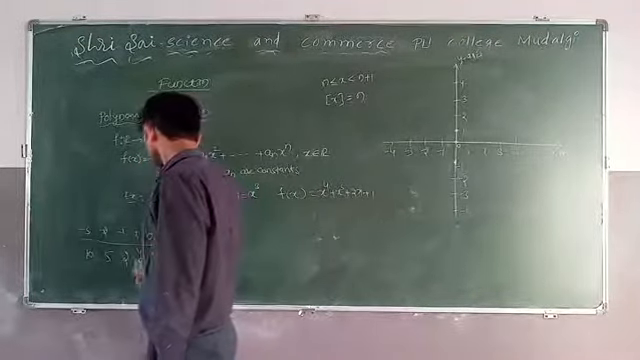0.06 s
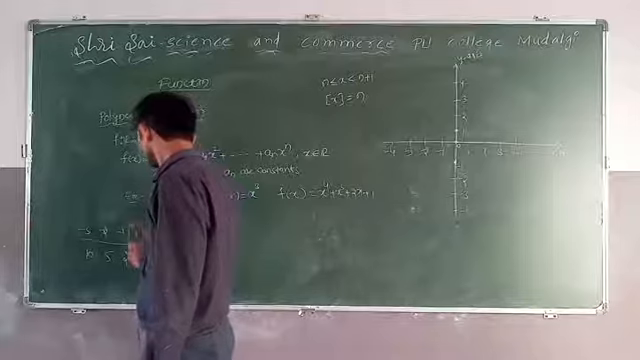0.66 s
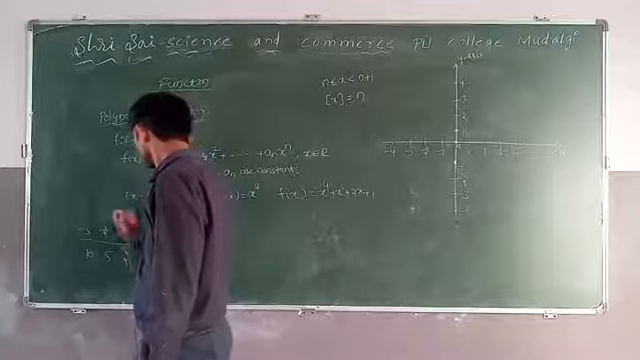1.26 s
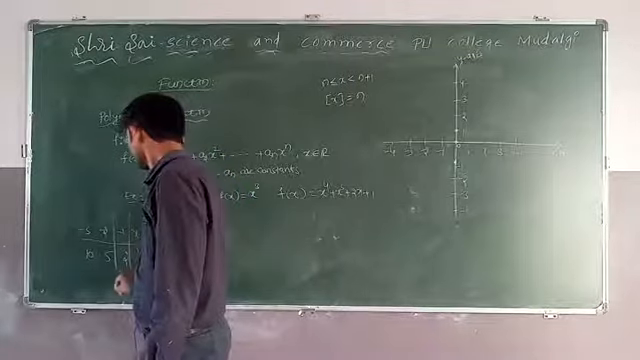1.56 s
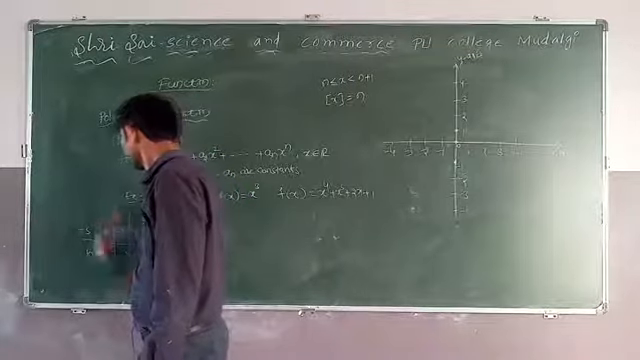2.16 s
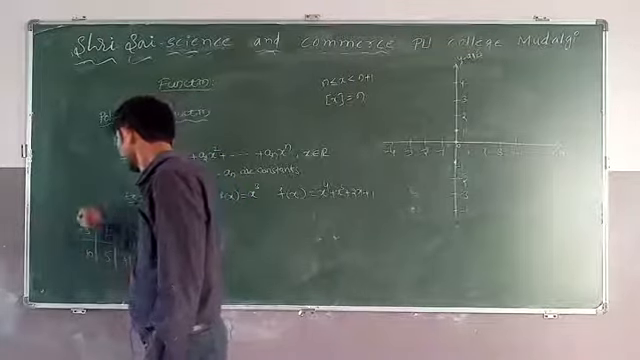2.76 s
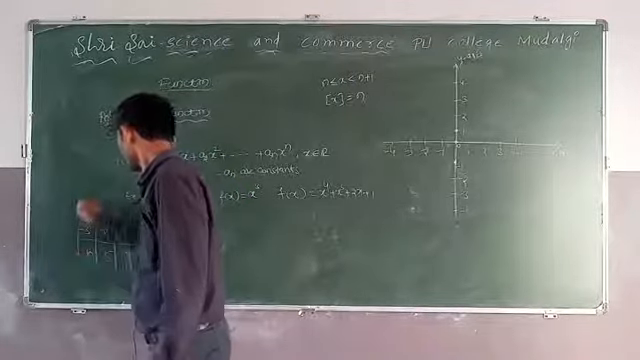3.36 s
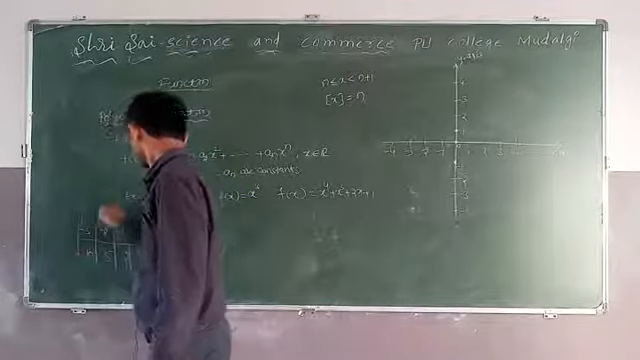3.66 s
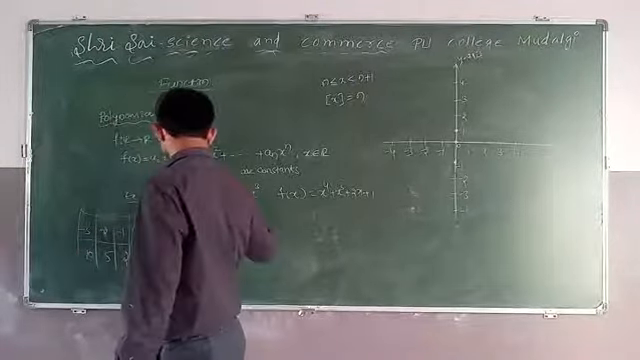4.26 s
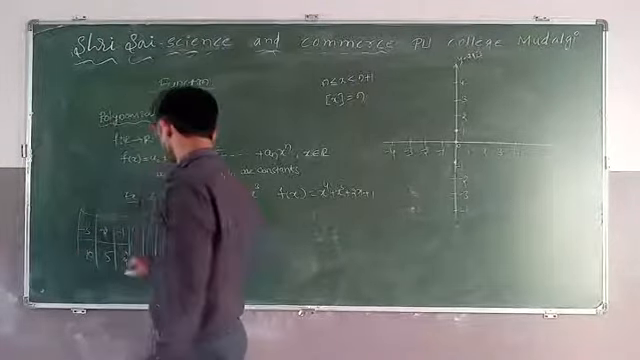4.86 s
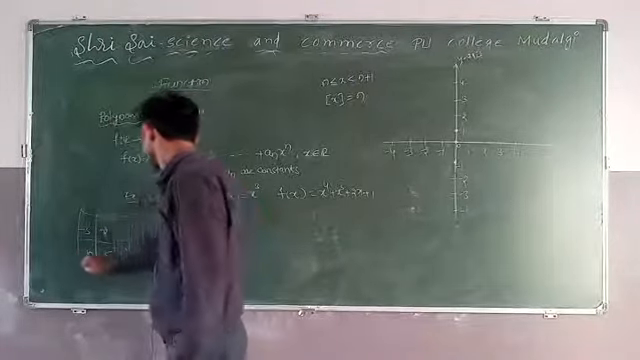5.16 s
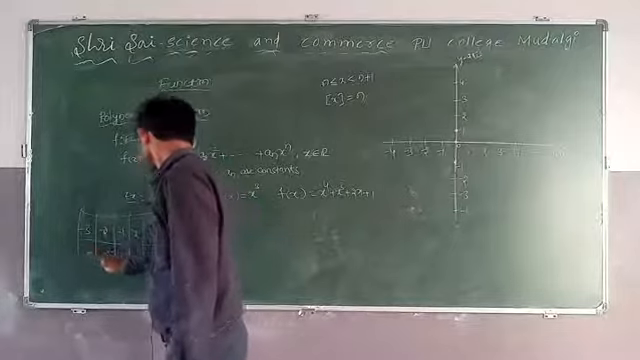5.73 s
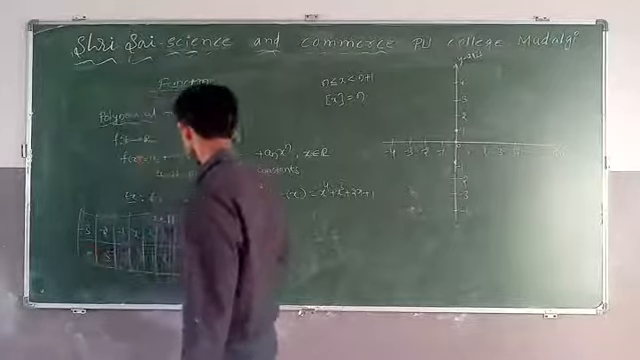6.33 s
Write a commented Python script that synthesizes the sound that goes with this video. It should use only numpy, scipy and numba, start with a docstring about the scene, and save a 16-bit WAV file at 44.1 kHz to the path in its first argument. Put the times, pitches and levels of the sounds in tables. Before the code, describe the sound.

The echo of a chalk stroke fades in a bare classroom, over a faint low hum and muffled traffic. Close to the microphone, chalk taps a blackboard at about 0.5, 1.3, 2.0 and 2.7 seconds. Each tap leads into a short, gritty scrape that swells, drops in pitch as it stops and rings in the room. The hand bumps the board softly near 1.5 and 2.2 seconds. Outside, a vehicle passes, loudest around 1.3 seconds, and a far idling engine gradually pulls away from 2 seconds on. A tap at 3.4 seconds starts a longer, lighter line lasting until 4.5, followed by a faint short rub. Another tap at 5.5 seconds begins a line that ends near 6.1, then a tiny scrape and a duller tap come at 6.3. A sleeve swishes very faintly around 2.6, 4.6 and 5.2 seconds.

```python
"""First, the echo of a chalk line dies away in a bare classroom, over a murmur of traffic and a faint hum.
Close to the microphone, more lines are ruled on the blackboard: the chalk lands with a tap, scrapes on
as a stream of tiny slips and falls in pitch as it brakes. Now and then the hand bumps the board or a
sleeve swishes. Outside, a vehicle goes by and a far engine idles, then pulls away."""
import sys
import numpy as np
from scipy import signal
from scipy.fft import rfft, irfft, next_fast_len
from scipy.io import wavfile
from scipy.ndimage import uniform_filter1d
from numba import njit

SR = 44100
rng = np.random.default_rng(int(sys.argv[2]) if len(sys.argv) > 2 else 0)


def master(y):
    """Save y as 16-bit WAV."""
    cut = np.clip(np.atleast_2d(y).T, -1, 1)
    pcm = np.round(cut * 32767)  # scale
    wavfile.write(sys.argv[1], SR, pcm.astype(np.int16))


N = 281881
TIME = np.arange(N) / SR


def from_db(db):
    """Decibels to gain."""
    return 10 ** (np.asarray(db) / 20)


def rms_one(x):
    """Scale to rms 1."""
    return x / np.sqrt(np.mean(x ** 2) + 1e-20)


def evened(x, size):
    """Hold the running rms over `size` samples at 1."""
    return x / np.sqrt(np.abs(uniform_filter1d(x ** 2, size)) + 1e-20)


def at_hz(points, hz):
    """Read a table on a log-frequency axis."""
    table_hz, value = np.transpose(points)
    return np.interp(np.log(np.maximum(hz, 1)), np.log(table_hz), value)


def coloured(x, spectrum):
    """Filter a sound by a curve of frequency_hz, gain_db."""
    size = next_fast_len(N + SR // 10)
    gain = from_db(at_hz(spectrum, np.fft.rfftfreq(size, 1 / SR)))
    return irfft(rfft(x, size) * gain, size)[:N]


def cut(x, hz, kind, order=2):
    """Butterworth low- or high-pass."""
    return signal.sosfilt(signal.butter(order, hz, kind, fs=SR, output="sos"), x)


def drift(per_s):
    """A random curve of rms 1 that turns `per_s` times a second."""
    return rms_one(np.interp(TIME * per_s, np.arange(N), rng.standard_normal(N)))


def swell(peak_s, attack_s, release_s):
    """A rounded rise to 1 at a moment, and a rounded fall after it."""
    return np.exp(-((TIME - peak_s) / np.where(TIME < peak_s, attack_s, release_s)) ** 2)


def ring(x, modes):
    """Each mode rings as a dying sine at a slightly random level; neighbours swing opposite ways."""
    out = 0
    for k, (hz, db, t60_s) in enumerate(modes):
        decay, angle = from_db(-60 / (t60_s * SR)), 2 * np.pi * hz / SR
        swing = signal.lfilter([0, np.sin(angle)], [1, -2 * decay * np.cos(angle), decay ** 2], x + 1e-18)
        out = out + (-1) ** k * from_db(db + rng.normal(0, 1)) * swing
    return out


# How long the bare classroom rings: frequency_hz, t60_s
ROOM_DECAY = [(200, 1.6), (700, 2.2), (2000, 2.0), (3000, 1.85), (4000, 1.2), (5000, .8), (6500, .6),
              (8000, .4), (12000, .2)]
# Colour of its reverberation at the microphone: frequency_hz, gain_db
ROOM_COLOUR = [(200, -10), (700, -2), (2000, -1.5), (3000, -1.5), (4000, -2.5), (6000, -4.5), (9000, -19),
               (14000, -16.5)]
def classroom(build_s=0.022):
    """The room's answer to a click: dense echoes that build up, then die sooner in the treble."""
    t = TIME[:3 * SR]
    hz, white = np.fft.rfftfreq(len(t), 1 / SR), rfft(rng.standard_normal(len(t)))
    edges_hz, out = np.geomspace(80, 16000, 56), 0
    for low, high in zip(edges_hz, edges_hz[1:]):
        centre_hz = np.sqrt(low * high)
        band = irfft(white * ((hz >= low) & (hz < high)))
        fade = from_db(-60 * t / at_hz(ROOM_DECAY, centre_hz)) * (1 - np.exp(-t / build_s))
        out = out + from_db(at_hz(ROOM_COLOUR, centre_hz)) * band * fade / np.linalg.norm(fade)
    return out


# How the board radiates a scrape, here and in scrape(): frequency_hz, gain_db
BOARD_COLOUR = [(150, -5), (600, 1.5), (1250, -0.5), (2000, 0), (3000, 0), (4000, -7), (5000, -14.5),
                (6500, -22), (8000, -37), (11000, -49.5), (13000, -56.5), (15500, -45.5)]
def dying_echo(room, level_db=-35.5, pitch_hz=2150, ago_s=0.24):
    """All around the microphone, a line drawn just before still rings in the room."""
    tail = np.pad(room[round(ago_s * SR):], (0, N))[:N]
    octave = cut(cut(tail, pitch_hz, "high"), pitch_hz * 2, "low")
    echo = coloured(octave, BOARD_COLOUR)
    return from_db(level_db) * echo / np.std(echo[:SR // 10])


# Murmur of the traffic, heard from indoors: frequency_hz, gain_db
MURMUR_COLOUR = [(150, -6.5), (350, -3.5), (580, 1.5), (760, 3), (1000, -2), (1330, 3), (1620, -2),
                 (1930, 5), (2150, -4.5), (2600, -3), (3300, -10.5), (4000, -20), (5000, -34.5),
                 (8500, -56)]
# The rumble beneath it: frequency_hz, gain_db
RUMBLE_COLOUR = [(25, -32.5), (45, -2.5), (58, -4.5), (70, -6), (100, -6.5), (113, -1), (122, -2),
                 (132, -1), (150, -2), (185, -1), (260, -11), (450, -11.5), (900, -42), (2000, -74)]
def street(murmur_db=-42.5, rise_db_per_s=1.0, rumble_db=-49.5, hiss_db=-93):
    """Outside, slowly thickening traffic, blurred by the room: murmur, rumble and a trace of hiss."""
    # one vehicle goes by and swells both murmur and rumble
    passing = swell(1.265, attack_s=0.22, release_s=1.7)
    pass_murmur_db, pass_rumble_db, waver_db = -38.5, -39, 0.5
    murmur = rms_one(cut(coloured(rng.standard_normal(N), MURMUR_COLOUR), 6000, "low"))
    murmur *= from_db(waver_db * drift(12))
    murmur *= np.hypot(from_db(murmur_db + rise_db_per_s * TIME), from_db(pass_murmur_db) * passing)
    rumble = rms_one(coloured(rng.standard_normal(N), RUMBLE_COLOUR))
    rumble *= np.hypot(from_db(rumble_db), from_db(pass_rumble_db) * passing)
    return murmur + rumble + from_db(hiss_db) * rng.standard_normal(N)


# Faint hum in the classroom: pitch_hz, level_db
HUM_TONES = [(112, -51), (131, -57)]
def hum(waver_db=4.5, wander_rad=0.66):
    """Room tone: low sines that waver in level and phase."""
    out = 0
    for hz, db in HUM_TONES:
        amplitude = np.sqrt(2) * from_db(db + waver_db * drift(2.7))
        out = out + amplitude * np.sin(2 * np.pi * hz * TIME + wander_rad * drift(4))
    return out


# Low resonances of the classroom, which pick out the engine's orders: centre_hz, width_hz, gain_db
ROOM_RESONANCES = [(46.4, 13, -9.5), (60.3, 4.4, -8.5), (73, 3.1, -5.5), (78.9, 4.7, 2.5), (96.4, 4, -2),
                   (110.7, 4.5, -2.5), (128, 7.6, -9.5), (148.3, 8.2, -4.5), (181.3, 13, -8)]
def engine(idle_hz=19.3, pull_away_s=2.0, rise_hz_per_s=1.96, flutter_db=2.5, wander_rad=0.66):
    """Far off, an engine idles, then pulls away; its orders swell as they cross the room's resonances."""
    idle_db, loaded_db, load_time_s = -54, -41.5, 2.2
    pulling_s = np.maximum(TIME - pull_away_s, 0)
    cycle_hz = idle_hz + rise_hz_per_s * pulling_s
    gain_db = np.interp(pulling_s, [0, load_time_s], [idle_db, loaded_db])
    phase = 2 * np.pi * np.cumsum(cycle_hz) / SR
    out, total_power = 0, 0
    for order in range(2, 9):
        power = sum(from_db(db) ** 2 / (1 + (2 * (order * cycle_hz - hz) / width_hz) ** 2)
                    for hz, width_hz, db in ROOM_RESONANCES)
        tone = np.sin(order * phase + 2 * np.pi * rng.random() + wander_rad * drift(4.7))
        out = out + np.sqrt(2 * power) * tone * from_db(flutter_db * drift(8))
        total_power = total_power + power
    return from_db(gain_db) * out / np.sqrt(total_power.mean())


# Chalk lands on the board: start_s, peak_db, hardness_hz, rebound_delay_ms, rebound_relative_db
CHALK_LANDINGS = [ (0.4658, -16, 3544, 1.29, 2.5), (1.256, -12.5, 3710, 1.43, 0),
                  (2.0112, -8.5, 3930, 0.96, -1), (2.7306, -7.5, 3180, 1.66, -7),
                  (3.3867, -8.5, 3650, 0.71, -1), (5.4682, -7, 5100, 0.46, -6.5),
                  (5.4813, -25, 7000, 0.59, -6.5), (6.2746, -11.5, 1470, 3.03, -4.5), ]
# Short ring of chalk and board under a tap: pitch_hz, gain_db, t60_s
CHALK_MODES = [(353, -13.5, 0.083), (764, -7, 0.006), (1310, 0, 0.017), (1590, 2, 0.015),
               (2030, -2.5, 0.012), (2407, -8, 0.028), (3140, -10, 0.022), (3660, -12, 0.023),
               (4200, -19, 0.054), (4930, -15.5, 0.023), (6540, -10, 0.0065)]
def taps(dull_hz=3400, low_cut_hz=330):
    """Close up, a dull pulse as the tip lands, then a rebound that sets chalk and board ringing."""
    out, size = np.zeros(N + SR), SR // 10
    click = signal.unit_impulse(size)
    for start_s, peak_db, hardness_hz, delay_ms, rebound_db in CHALK_LANDINGS:
        landing = (cut(click, dull_hz, "low"), start_s, peak_db)
        rebound = (ring(click, CHALK_MODES), start_s + delay_ms / 1000, peak_db + rebound_db)
        for blow, at_s, db in (landing, rebound):
            blow = cut(cut(blow, hardness_hz, "low", order=5), low_cut_hz, "high")
            start = round(at_s * SR)
            out[start:start + size] += from_db(db) * blow / np.abs(blow).max()
    return out[:N]


# Lines ruled on the board ("top" is at top speed): stop_s, length_s, rise_s, swell_db, top_db, top_hz,
# top_grit_db, brake_s, stop_db, stop_grit_db
CHALK_STROKES = [ (0.729, 0.21, 0.17, 17, -32, 3320, -64, 0.043, -23.5, -52),
                 (1.492, 0.21, 0.16, 15, -31, 3870, -59.5, 0.028, -21.5, -47.5),
                 (2.23, 0.2, 0.16, 10, -29.5, 3720, -50, 0.025, -22, -48.5),
                 (2.888, 0.15, 0.1, 14, -31.5, 3240, -60, 0.035, -22.5, -45.5),
                 (4.496, 1.064, 0.32, 5, -38.5, 4170, -74.5, 0.019, -27, -86),
                 (4.678, 0.17, 0.087, 14, -43.5, 2014, -90, 0.028, -50, -90),
                 (6.139, 0.66, 0.22, 7, -34, 4060, -57.5, 0.035, -26, -68),
                 (6.234, 0.07, 0.06, 7, -34.5, 2620, -86, 0.03, -42, -85), ]
def strokes(start_hz=1780, stop_hz=2340, lift_hz=1417, touch_s=0.01, release_s=0.011):
    """The curves that drive the scrape: the hand gathers speed, coasts, then digs in as it brakes."""
    ease_db_per_s2, slow_per_s2 = 25, 0.55   # a coasting hand eases off and slows with time squared
    rasp_gain, grit_gain, age_s, speed = np.zeros((4, N))
    pitch_hz = np.full(N, float(start_hz))
    for (stop_s, length_s, rise_s, swell_db, top_db, top_hz,
         top_grit_db, brake_s, stop_db, stop_grit_db) in CHALK_STROKES:
        t = TIME - (stop_s - length_s)
        contact = np.clip(t / touch_s, 0, 1) * swell(stop_s, np.inf, release_s)
        push = np.sin(np.pi / 2 * np.clip(t / rise_s, 0, 1))
        coast_s2 = np.clip(t - rise_s, 0, length_s) ** 2
        slowing = np.exp(-slow_per_s2 * coast_s2)
        stroke_speed = push * slowing
        dig = swell(stop_s, brake_s, np.inf)
        glide = from_db(top_db - swell_db * (1 - push) - ease_db_per_s2 * coast_s2)
        rasp_gain += contact * np.hypot(glide, from_db(stop_db) * dig)
        # grit needs speed: it sets in later and fades sooner than the rasp
        glide_grit = from_db(top_grit_db) * stroke_speed ** 6
        grit_gain += contact * np.hypot(glide_grit, from_db(stop_grit_db) * dig)
        free_hz = (start_hz + (top_hz - start_hz) * push) * slowing
        braked_hz = np.interp(TIME, [stop_s, stop_s + release_s], [stop_hz, lift_hz])
        stroke_hz = free_hz + (braked_hz - free_hz) * dig ** 2
        pitch_hz, age_s, speed = np.where(t >= 0, [stroke_hz, t, stroke_speed], [pitch_hz, age_s, speed])
    return rasp_gain, grit_gain, pitch_hz, age_s, speed


def slips(per_s, size_db):
    """The tip slips in clicks at random moments, mostly small and a few large."""
    sizes = from_db(size_db * np.minimum(rng.exponential(1, N), 4)) * rng.choice([-1, 1], N)
    return sizes * (rng.random(N) < per_s / SR)


@njit
def moving_band(x, centre_hz, q):
    """State-variable band-pass whose centre moves."""
    out, band_state, low_state = np.zeros(len(x)), 0.0, 0.0
    for i in range(len(x)):
        tuning = np.tan(np.pi * centre_hz[i] / SR)
        out[i] = (band_state + tuning * (x[i] - low_state)) / (1 + tuning * (tuning + 1 / q))
        band_state = 2 * out[i] - band_state
        low_state += 2 * tuning * out[i]
    return out


# Dull rub of chalk too slow to bite: frequency_hz, gain_db
RUB_COLOUR = [(3000, 2.5), (4500, -13)]
# Fine grit that crumbles off under pressure: frequency_hz, gain_db
GRIT_COLOUR = [(2000, -17.5), (4500, 16), (6500, 9.5), (8300, -5), (11000, -9.5), (12800, -17.5),
               (14200, -6.5), (15500, -2.5)]
def scrape(bite_speed=0.28, waver=0.08, surge_db=3.5, judder_db=1.3):
    """Close up, chalk catches and slips on the board's grain; the faster it moves, the higher it sounds."""
    rasp_gain, grit_gain, pitch_hz, age_s, speed = strokes()
    pitch_hz = pitch_hz * np.exp(waver * drift(35))   # the hand's speed is never quite even
    rasp = moving_band(slips(per_s=12000, size_db=2.5), np.clip(pitch_hz, 200, 9000), q=1.67)
    rasp = evened(coloured(rasp, BOARD_COLOUR), size=600)
    rubbing = np.exp(-(speed / bite_speed) ** 6)   # below this share of top speed the chalk only rubs
    rasp = rasp_gain * ((1 - rubbing) * rasp + rubbing * coloured(rasp, RUB_COLOUR))
    grit = rms_one(coloured(slips(per_s=1500, size_db=1.5), GRIT_COLOUR))
    grit *= grit_gain * from_db(surge_db * drift(40))
    direct = (rasp + grit) * from_db(judder_db * drift(170))
    # a small nearby surface reflects only the treble; its lag grows along the line, so a comb slides down
    treble = coloured(direct, [(2200, -22), (3500, -7), (5000, -2), (9000, -2), (13000, -10)])
    lag_s = 0.0007 + 0.0009 * age_s + 0.00003 * drift(25)
    return direct + np.interp(TIME - lag_s, TIME, treble)


# The hand bumps the board: start_s, strength_db
HAND_BUMPS = [(1.5472, -13.5), (1.616, -31), (1.671, -25.5), (2.246, -18.5)]
# Low modes of the board's panel: pitch_hz, gain_db, t60_s
BOARD_MODES = [(152.4, -27.5, 1), (205.4, -22.5, 0.85), (237, -24.5, 0.42), (294, 0, 0.02),
               (400, -5.5, 0.024), (555, -7, 0.024)]
def bumps(soft_hz=700):
    """Near the microphone, soft blows of the hand wake the low modes of the panel."""
    blows = np.zeros(N)
    for start_s, db in HAND_BUMPS:
        blows[round(start_s * SR)] = from_db(db)
    return cut(ring(blows, BOARD_MODES), soft_hz, "low")


# The sleeve brushes as the arm swings back: peak_s, level_db, half_length_s
SLEEVE_SWISHES = [(2.608, -67, 0.098), (4.642, -72, 0.1), (5.221, -68.5, 0.29)]
# Colour of the cloth: frequency_hz, gain_db
CLOTH_COLOUR = [(2000, -24.5), (4000, -0.5), (5600, 0.5), (6700, -5.5), (8000, -22), (11000, -26.5)]
def sleeve(rustle_db=-90):
    """At the board, faint swishes of cloth over a slight steady rustle."""
    swishes = sum(from_db(db) * swell(peak_s, half_s, half_s) for peak_s, db, half_s in SLEEVE_SWISHES)
    cloth = rms_one(coloured(rng.standard_normal(N), CLOTH_COLOUR))
    return (from_db(rustle_db) + swishes) * cloth


def scene(tap_send_db=-1, bump_send_db=-2, echo_turns_per_s=0.33):
    """One microphone: chalk and board close by, the classroom around them, the street beyond."""
    room, scraping, tapping, bumping = classroom(), scrape(), taps(), bumps()
    close = tapping + scraping + bumping
    sent = scraping + from_db(tap_send_db) * tapping + from_db(bump_send_db) * bumping
    # the writer moves, so the sound passes back and forth between two patterns of echoes
    turn = 2 * np.pi * echo_turns_per_s * TIME
    echo = signal.fftconvolve(sent * np.cos(turn), room)
    echo += signal.fftconvolve(sent * np.sin(turn), classroom())
    return (dying_echo(room) + close + echo[:N] + sleeve() + hum() + engine() + street())[None]


def record(dry, bass_hz=40, top_hz=15800):
    """The microphone drops the deepest bass; the top is cut steeply."""
    top_cut = signal.ellip(10, 0.1, 80, top_hz, fs=SR, output="sos")
    return signal.sosfilt(top_cut, cut(dry, bass_hz, "high", order=6))


dry = scene()
out = record(dry)
master(out)
```